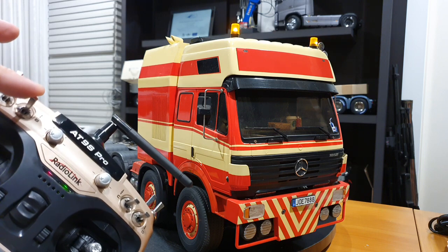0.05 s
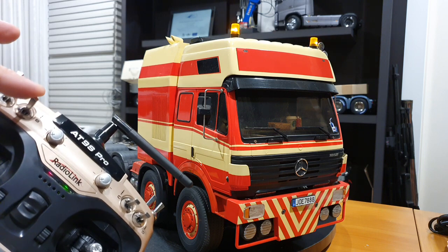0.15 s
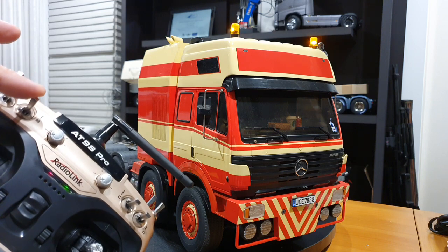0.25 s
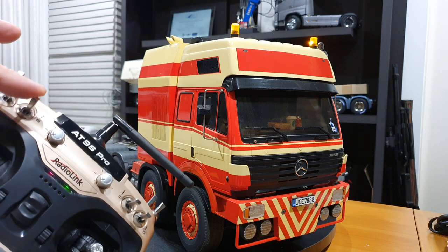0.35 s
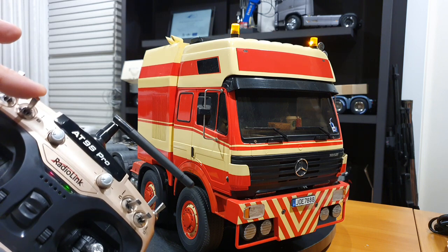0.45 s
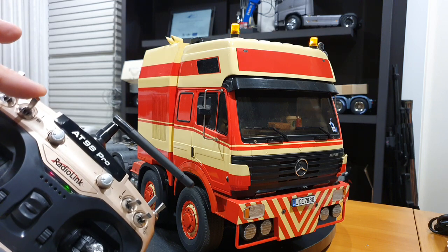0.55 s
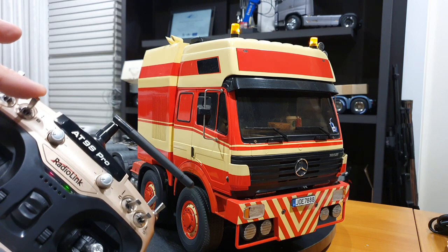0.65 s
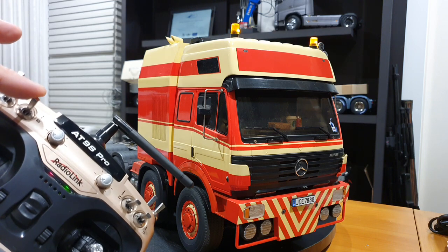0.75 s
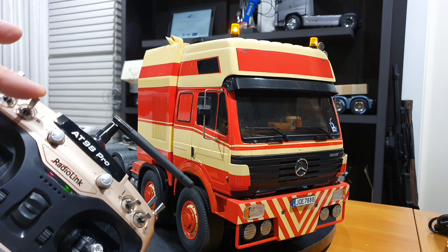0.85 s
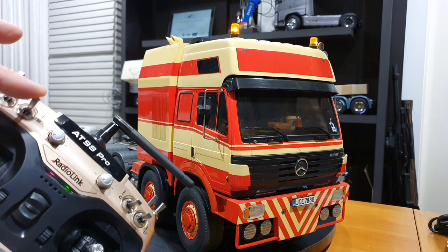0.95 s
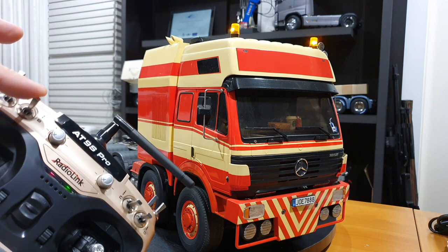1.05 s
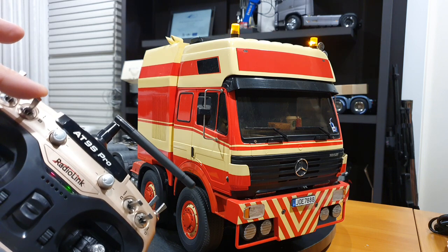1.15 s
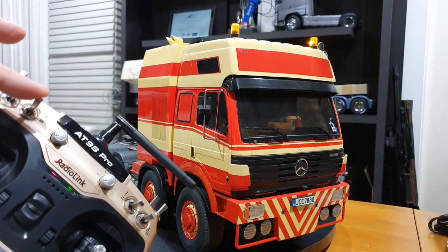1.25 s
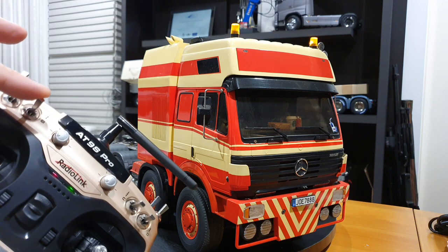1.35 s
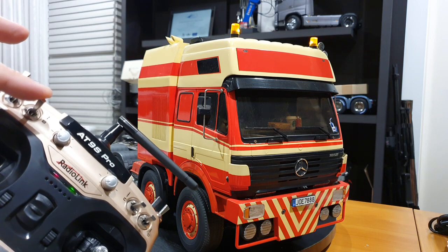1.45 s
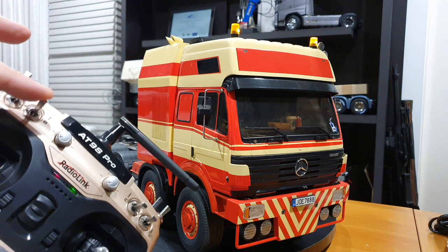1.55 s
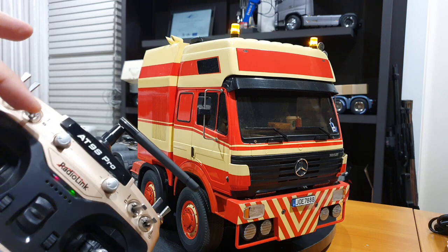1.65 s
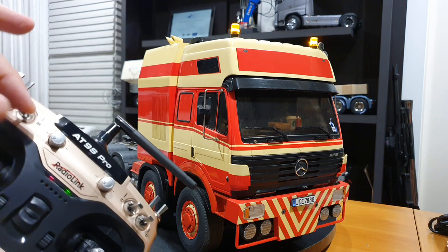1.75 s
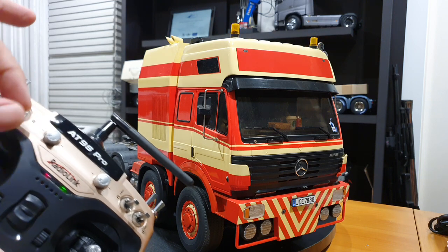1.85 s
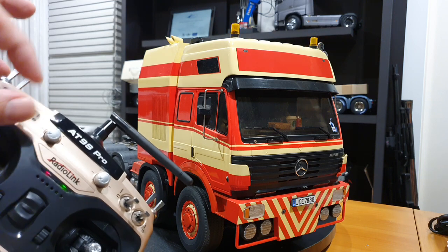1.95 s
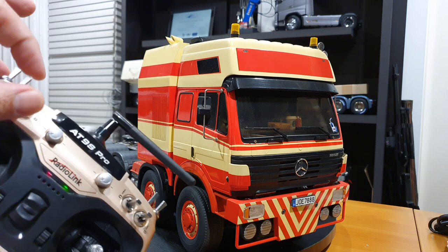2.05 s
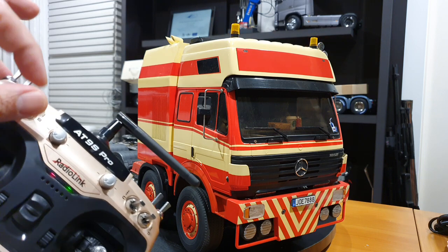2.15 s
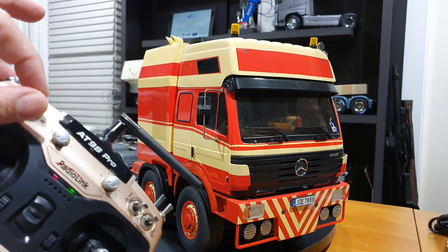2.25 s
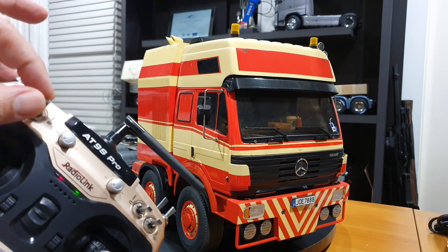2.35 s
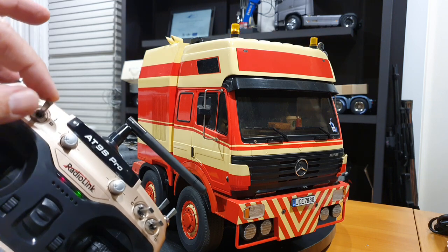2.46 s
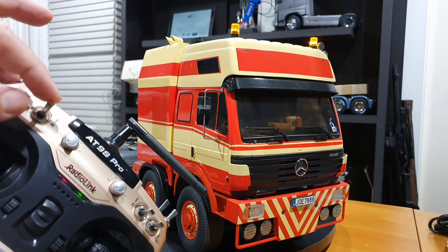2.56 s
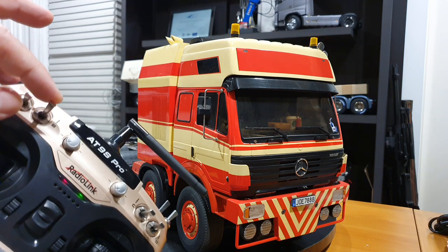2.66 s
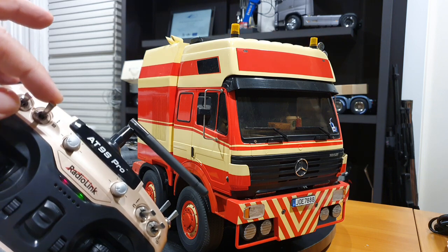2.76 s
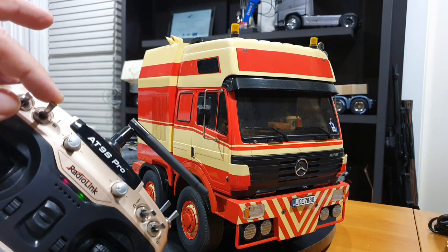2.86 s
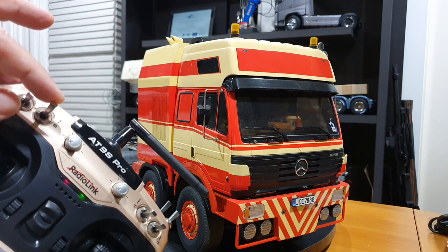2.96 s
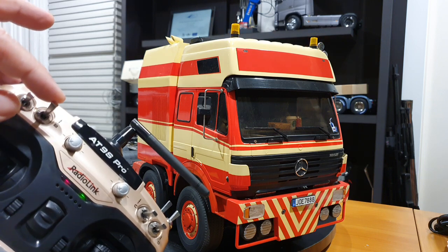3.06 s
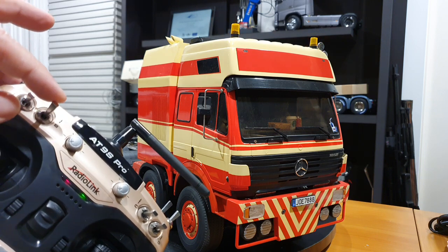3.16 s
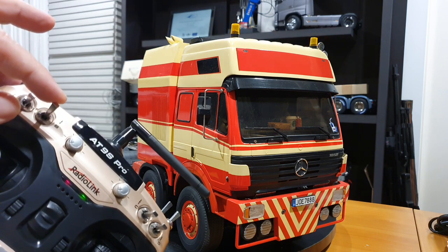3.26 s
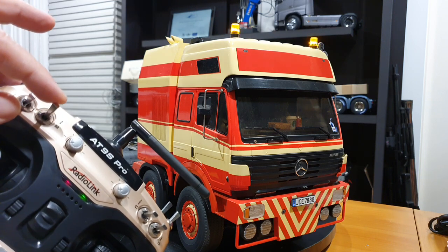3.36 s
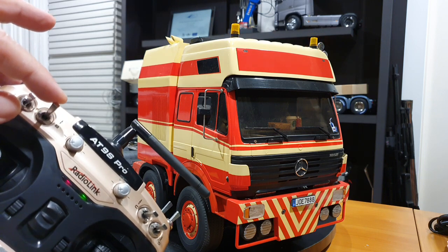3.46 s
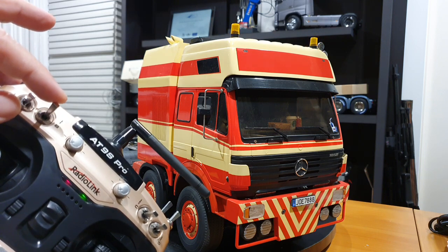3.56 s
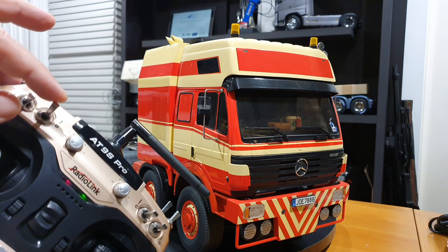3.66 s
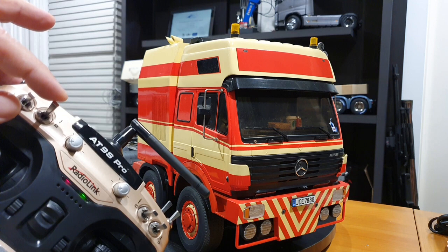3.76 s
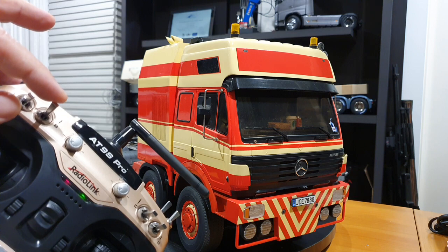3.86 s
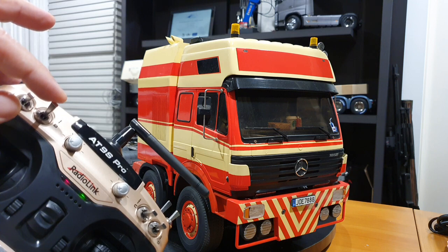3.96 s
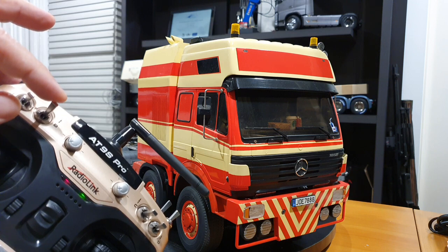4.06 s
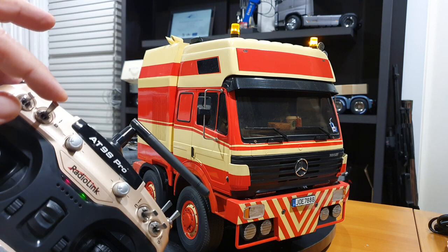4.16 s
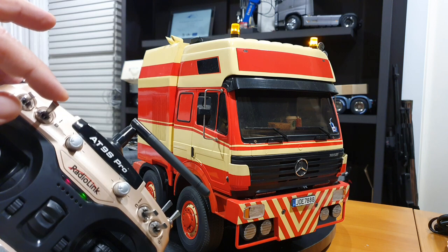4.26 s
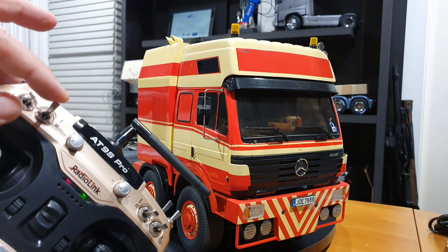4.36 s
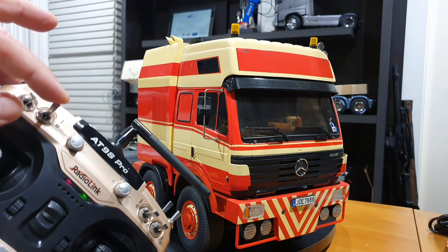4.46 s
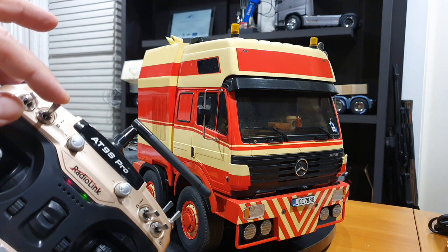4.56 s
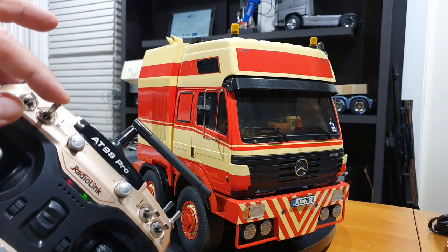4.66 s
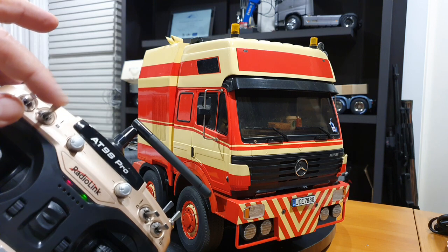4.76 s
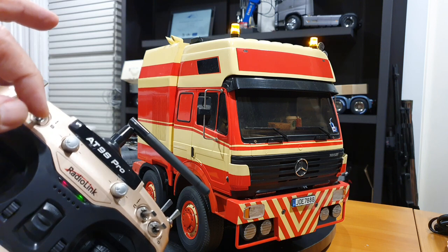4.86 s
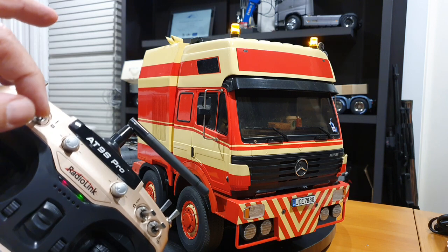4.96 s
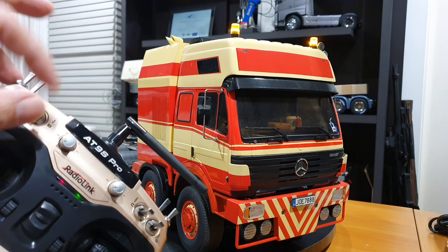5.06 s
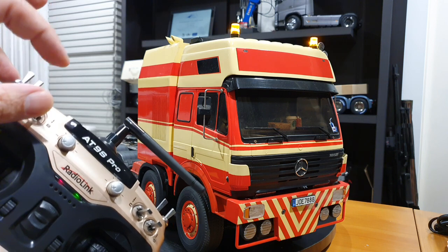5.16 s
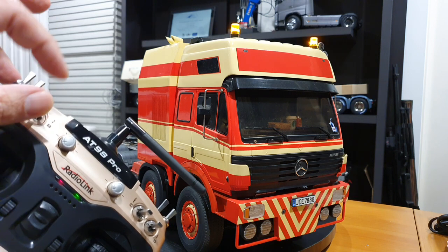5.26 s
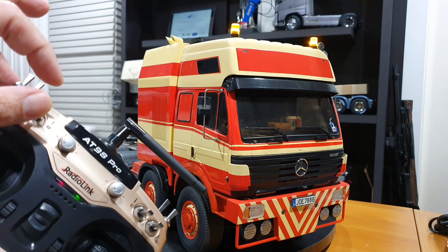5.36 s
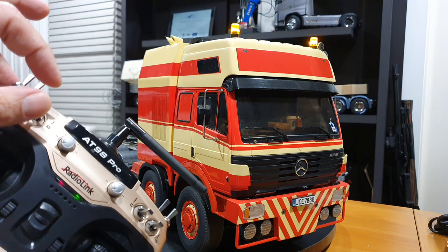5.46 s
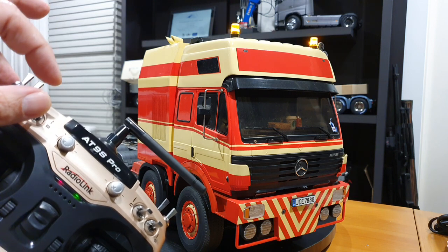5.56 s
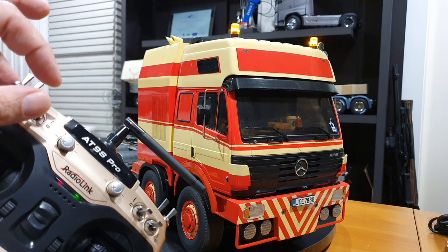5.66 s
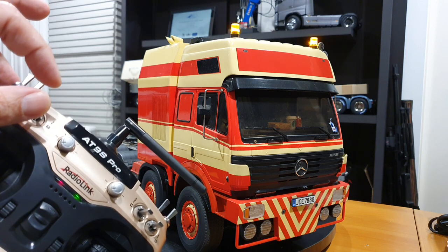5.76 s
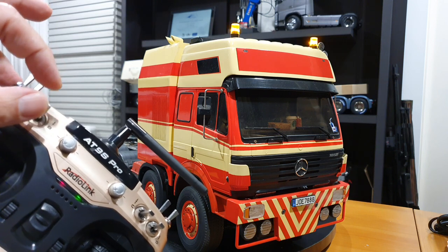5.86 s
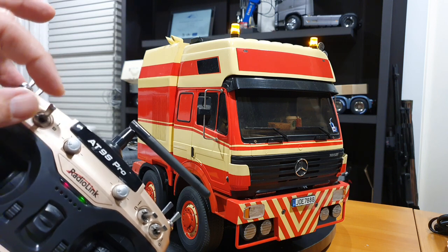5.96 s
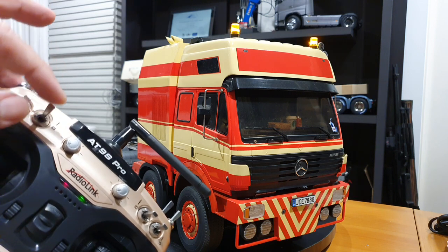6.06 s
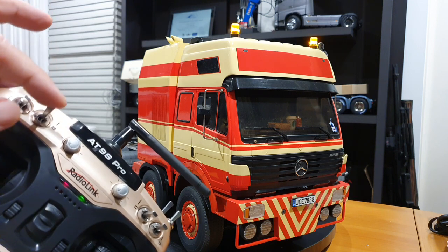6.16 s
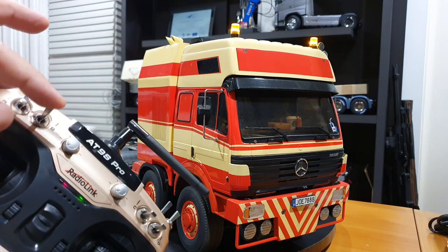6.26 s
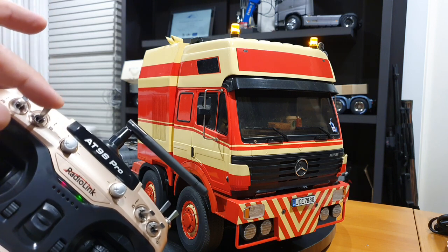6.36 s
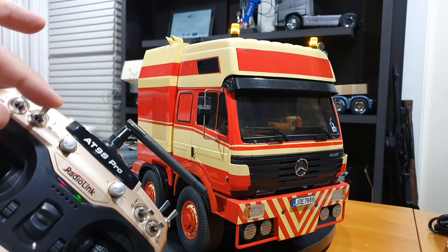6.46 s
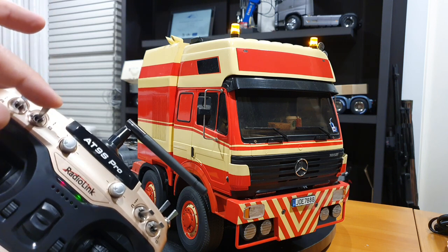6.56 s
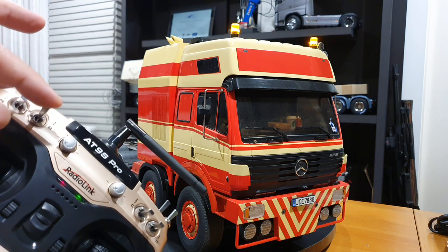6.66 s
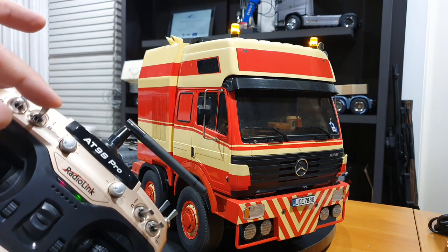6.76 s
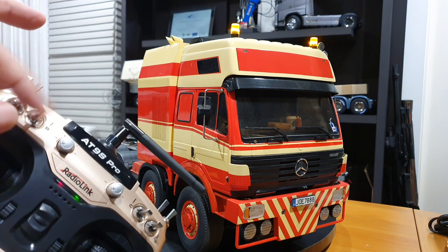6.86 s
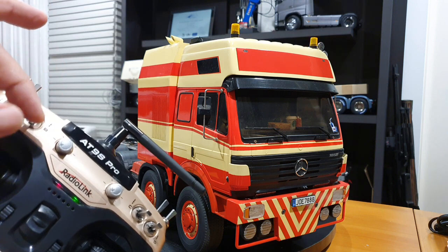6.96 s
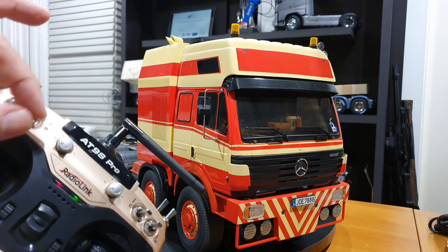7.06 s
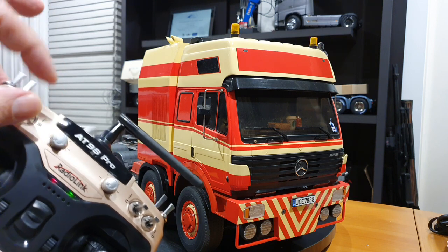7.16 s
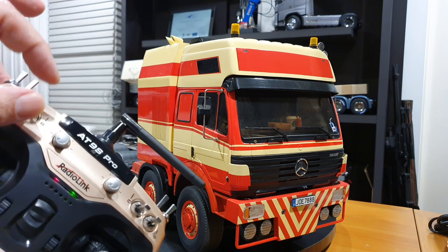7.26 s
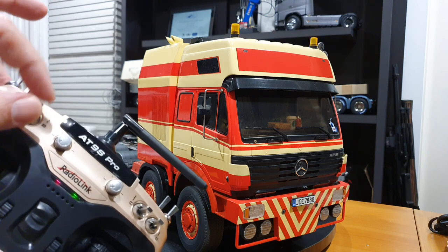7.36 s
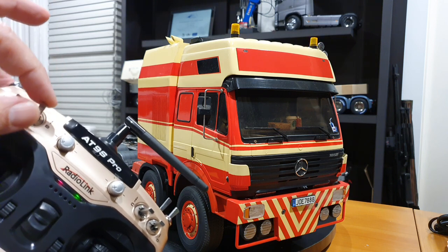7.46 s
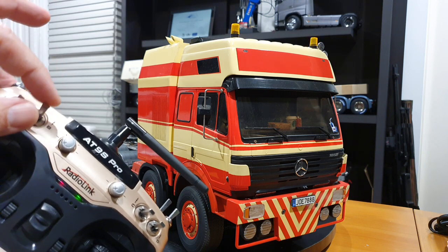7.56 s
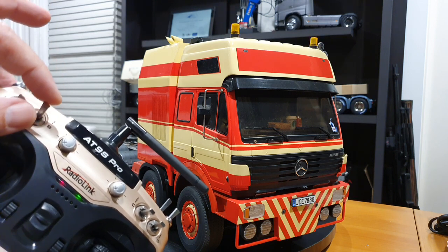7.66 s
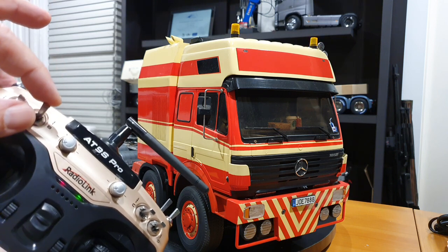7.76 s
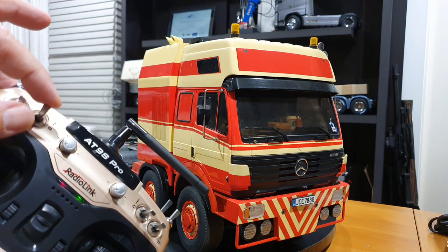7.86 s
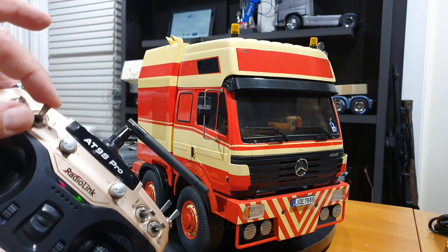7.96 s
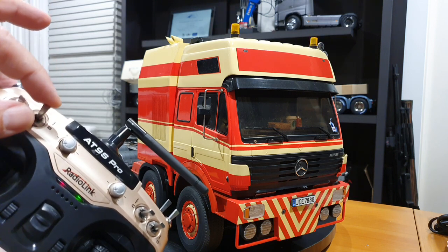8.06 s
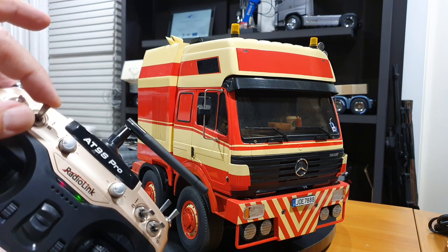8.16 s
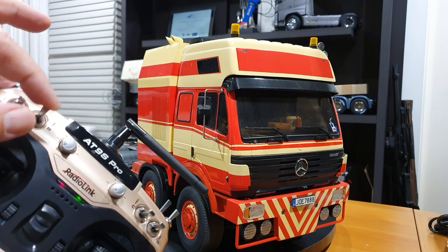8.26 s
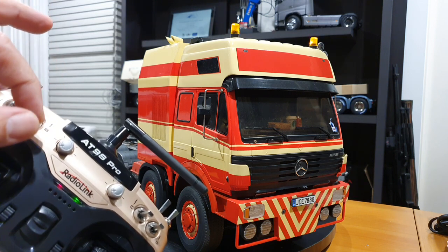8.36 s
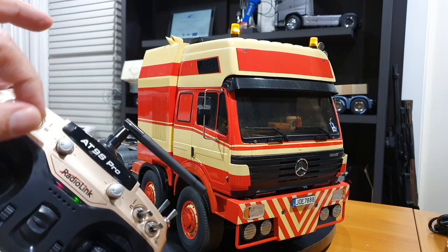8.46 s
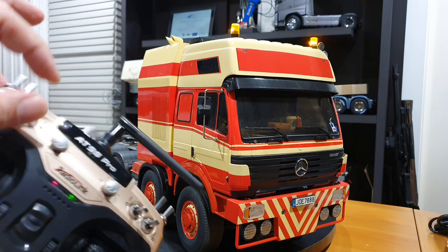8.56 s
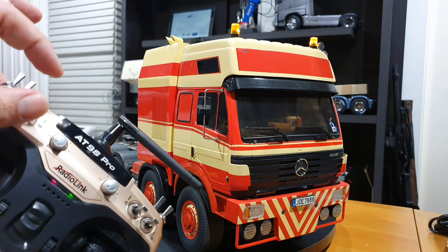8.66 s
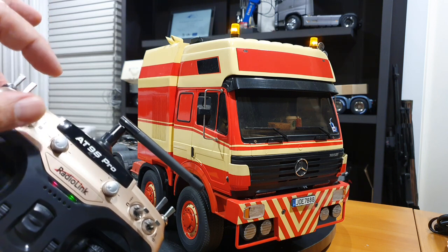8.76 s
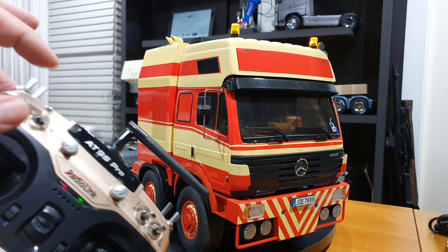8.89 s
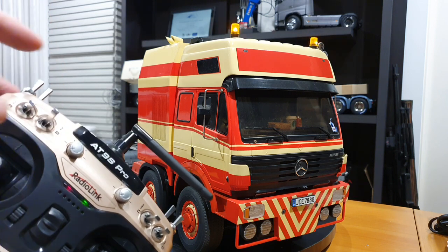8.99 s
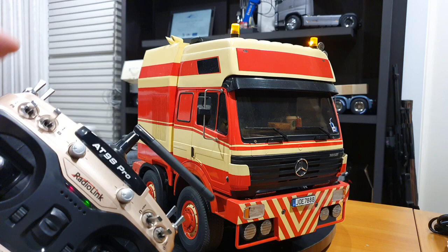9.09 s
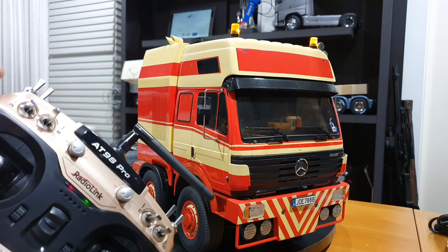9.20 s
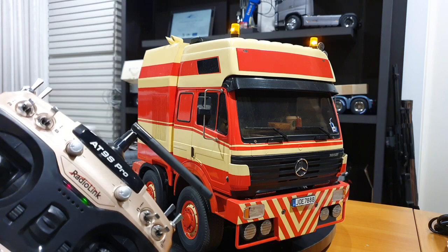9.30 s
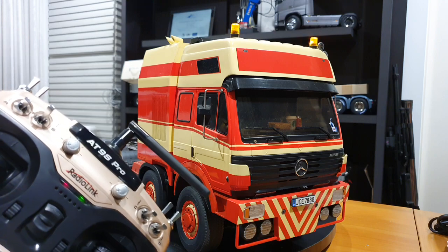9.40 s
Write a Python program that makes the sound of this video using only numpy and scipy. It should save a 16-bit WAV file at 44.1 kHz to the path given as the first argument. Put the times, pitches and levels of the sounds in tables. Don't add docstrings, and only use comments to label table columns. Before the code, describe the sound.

In a quiet furnished room, a steady soft fan rumble with low hum lines runs throughout. After nearly two seconds a springy switch lever snaps, then snaps back; after a pause of almost three seconds another pair follows, then two more pairs closer together. The clicks are dry, loud, plasticky and metallic, heard close and leaning left, with faint skin brushes on the case.

```python
import sys
import numpy as np
from scipy import signal
from scipy.fft import rfft, irfft, next_fast_len
from scipy.io import wavfile
from scipy.ndimage import uniform_filter1d

SR = 44100
rng = np.random.default_rng(int(sys.argv[2]) if len(sys.argv) > 2 else 0)


def convert_level_to_amplitude(level_db):
    exponent = np.asarray(level_db, float) / 20
    return 10 ** exponent


def persist_wave(psi):
    counts = np.round(np.clip(psi, -1, 1) * 32767).astype(np.int16)
    wavfile.write(sys.argv[1], SR, np.atleast_2d(counts).T)


N = 415863

FLIP_SAMPLES, BLOW_AT_MS = 16384, 50
THUMP_HZ = 750

# start_s, blow_db, metal_tick_db, back_panel_ring_db (set by the grip),
# bounce_pace (1 = usual)
OUT_FLIPS = [
    (1.770, 4.5, 2.5, 2.5, .9),
    (4.926, 6.5, 0, 1, 1.08),
    (7.0087, 5, 1, 1, .9),
    (8.431, 7.5, -1.5, 0, 1.15),
]
BACK_FLIPS = [
    (2.143, 5.33, 0, 0, 1.06),
    (5.2465, 4, 1.5, -4, 1.1),
    (7.290, 5.6, -1.4, 1, .95),
    (8.702, 5.3, -1.5, -1, 0.9),
]


def switch():
    out_throw = dict(release_ms=-3.5, release_db=-5, chatter_ms=-7, chatter_db=-26.5, blow_tick_db=-3)
    back_throw = dict(release_ms=-7, release_db=-10, chatter_ms=-6.5, chatter_db=-18, blow_tick_db=-4.5)
    out = np.zeros((2, N))
    for flips, throw, column in ((OUT_FLIPS, out_throw, 2), (BACK_FLIPS, back_throw, 3)):
        for start_s, *how in flips:
            sound = flip(throw, column, *how)
            add(out, sound, start_s - BLOW_AT_MS / 1000)
            add(out, room(sound), start_s)
    return out


def flip(throw, column, blow_db, tick_db, panel_db, pace):
    ms = np.arange(FLIP_SAMPLES) / SR * 1000 - BLOW_AT_MS
    rattle = convert_level_to_amplitude(-32) * np.exp(np.minimum(ms + 3, 0) / 7.5) * (ms < -3)
    push = convert_level_to_amplitude(-13.0) * rattle * rng.standard_normal(len(ms))
    lever = np.zeros(len(ms))
    lever_hz, lever_ms, tick_ms, tick_rise_ms = 2772, 1.0, 0.8, 0.045
    for at_ms, push_db, click_db, ring_db in contacts(**throw):
        since = np.maximum(ms - at_ms * pace - 0.071 * rng.standard_normal(), 0)
        push[np.argmax(since > 0)] += convert_level_to_amplitude(push_db)
        rattle = rattle + convert_level_to_amplitude(click_db) * (1 - np.exp(-since / tick_rise_ms)) * np.exp(-since / tick_ms)
        swing = np.sin(2 * np.pi * lever_hz * since / 1000)
        lever = lever + convert_level_to_amplitude(ring_db) * since * np.exp(-since / lever_ms) * swing

    case = signal.fftconvolve(case_ring(column, blow_db, panel_db), push[None], axes=1)[:, :len(ms)]
    case = convert_level_to_amplitude(-14.5) * np.array([case[0], delay(case[1], ms=0.3)])
    metal = lever + metal_tick(rattle, tick_db)
    metal = np.array([metal[0], convert_level_to_amplitude(-3.5) * delay(metal[1], ms=0.15)])
    small_body = signal.butter(4, 350, "high", fs=SR, output="sos")
    return convert_level_to_amplitude(blow_db) * signal.sosfilt(small_body, case + metal)


def contacts(release_ms, release_db, chatter_ms, chatter_db, blow_tick_db):
    blow_ms, bounce_ms, chatter_gap_ms = -1.7, 1.3, 1.8
    chatter = [(chatter_ms + k * chatter_gap_ms, -29, chatter_db, -25) for k in range(2)]
    release = (release_ms, -27, release_db, -28)
    blow = (blow_ms, 0, blow_tick_db, -26)
    bounces = [(blow_ms + (k + 1) * bounce_ms, -15.5, -3 - 0.5 * k, -28) for k in range(3)]
    return chatter + [release, blow] + bounces


# pitch_hz, t60_s, out_level_db, back_level_db, right_minus_left_db
CASE_MODES = [(504, 0.032, -3.5, 5, -12), (547, 0.024, 6.5, -6.5, -13), (656, 0.06, -9.5, -10, -6),
              (753, 0.029, -15.5, -20.5, -2.5), (923, 0.023, -21.5, -9.5, -6.5),
              (1172, 0.055, -3, -1, -4.5), (1286, 0.2, -15.5, -15, -3.5), (1310, 0.033, -11.5, -19.5, 8.5),
              (1470, 0.028, -13, -7, 2), (1670, 0.04, -5, -2, -5.5), (1868, 0.024, -6, -6.5, -3),
              (2004, 0.05, -10.5, -8.5, -1.5), (2274, 0.021, -10.5, -5, -12),
              (2375, 0.064, -7.5, -6.5, -1.5), (2434.5, 0.086, -26, -19, 1.5), (2546, 0.03, -7.5, -9, -9.5),
              (2750, 0.03, -4.5, -6.5, -8), (2900, 0.027, -13.5, -24.5, -2), (3057, 0.025, -12, -11.5, -10),
              (3530, 0.024, -11.5, -16, -15.5), (4700, 0.012, -19.5, -34, 5),
              (4670, .016, -21, -28.5, -20.5), (7380, 0.015, -11, -31, -10.5)]


def case_ring(column, blow_db, panel_db):
    modes = np.array(CASE_MODES, float)
    hz, t60, gain_db, right_db = modes[:, 0], modes[:, 1], modes[:, column], modes[:, 4]
    rock_db = 0.36 * (blow_db - 5.5)
    grip_db = panel_db * (hz < 1300)
    gain_db = gain_db + np.where(hz < THUMP_HZ, rock_db, grip_db) + 0.73 * rng.standard_normal(len(hz))

    s = np.arange(FLIP_SAMPLES)[:, None] / SR
    alternate_sign = (-1) ** np.arange(len(hz))
    rings = np.sin(2 * np.pi * hz * s) * convert_level_to_amplitude(-60 * s / t60) * alternate_sign
    rings = rings * (1 - np.exp(-hz * s / 2.1))
    far_side = np.where(hz < THUMP_HZ, -1, 1)
    return np.array([rings @ convert_level_to_amplitude(gain_db), rings @ (far_side * convert_level_to_amplitude(gain_db + right_db))])


# pitch_hz, density_db (dB per Hz)
TICK_COLOUR = [(1500, -18), (3000, 0.5), (5000, 1.5), (6500, -1.5), (7900, -10), (10500, -4.5),
               (12500, -2.5), (14000, -8), (15500, -2.5), (15900, -11), (16600, -25)]


def metal_tick(rattle, tick_db):
    alike = 0.4
    left, other = rng.standard_normal((2, len(rattle)))
    grain = np.array([left, alike * left + np.sqrt(1 - alike ** 2) * other])
    colour = convert_level_to_amplitude(curve(TICK_COLOUR, np.fft.rfftfreq(len(rattle), 1 / SR), column=1))
    return convert_level_to_amplitude(-16 + tick_db) * irfft(rfft(rattle * grain) * colour)


# pitch_hz, level_db
ROOM_BANDS = [
    (400, -18.5),
    (1000, -13.5),
    (2200, -16),
    (5000, -16.5),
    (10000, -16.5),
    (16000, -19),
]


def room(x):
    size = x.shape[1]
    noise = far_noise(size, [(20, 0), (20000, 0)])
    hz, s = np.fft.rfftfreq(size, 1 / SR), np.arange(size) / SR
    power = np.sum(np.abs(rfft(x)) ** 2, axis=0)
    body, treble = (np.abs(uniform_filter1d(power, int(blur_hz / hz[1]))) for blur_hz in (190, 1500))
    colour = np.sqrt(np.where(hz < 3800, body, treble))
    centres = np.log(np.array(ROOM_BANDS)[:, 0])
    tail = 0
    for k, (_, db) in enumerate(ROOM_BANDS):
        t60_s = 0.22 - k * 0.004
        share = np.interp(np.log(hz + 1), centres, np.arange(len(ROOM_BANDS)) == k)
        band = irfft(rfft(noise) * colour * share * (hz < 15800))
        tail = tail + band * convert_level_to_amplitude(db - 60 * s / t60_s)
    rise_ms = 0.95
    return tail * (1 - np.exp(-(s * 1000 / rise_ms) ** 2)) * convert_level_to_amplitude(-24.5)


# start_s, level_db, pitch_hz, length_ms
BRUSHES = [
    (3.950, -79, 7660, 8),
    (5.19, -82, 7500, 4),
    (5.973, -59, 1230, 4.8),
    (8.389, -74, 6600, 1.5),
]


def fingers():
    peak_ms = 23
    out, ms = np.zeros((2, N)), np.arange(2048) / SR * 1000 - peak_ms
    for start_s, db, hz, length_ms in BRUSHES:
        band = signal.butter(2, [0.83 * hz, 1.03 * hz], "band", fs=SR, output="sos")
        puff = level(signal.sosfilt(band, rng.standard_normal((2, len(ms)))), db)
        add(out, puff * np.exp(-0.5 * (ms / length_ms) ** 2), start_s - peak_ms / 1000)
    return out


# pitch_hz, density_db (dB per Hz)
FAN_COLOUR = [(22, -49.5), (33, -16), (46, -10), (60, -7.5), (75, -8), (90, -17), (124, -15), (157, -9.5),
              (215, -4.5), (252, -0.5), (280, -8.5), (419, -14.5), (673, -14), (1100, -23.5)]
# pitch_hz, density_db (dB per Hz)
HISS_COLOUR = [(530, -32), (900, -5), (1310, 0.5), (1900, -7.5), (2870, -10.5), (4000, -21), (5300, -34),
               (5950, -25.5), (6900, -34), (7500, -38.5), (9300, -48.5), (11800, -41), (14500, -40),
               (15600, -39), (15850, -79.5)]
# pitch_hz, level_db (rms), wobble_db, wobble_rate_hz, left_minus_right_db
HUM_LINES = [
    (38.5, -61.5, 2.5, 7.2, -1.5),
    (100, -61, 1.77, 13, 0.5),
    (251.8, -65, 1.5, 20, -1),
    (293.4, -64, 4.5, 6.2, 4.5),
    (364, -68, 3, 12, 6),
    (455, -72.5, 3, 10, 4.5),
    (657, -68.5, 1.7, 5, -1.5),
    (675, -66, 0.5, 2, -3.5),
    (684, -76, 2, 3.6, 1),
]


def fan():
    rumble = level(far_noise(N, list(FAN_COLOUR) + [(1500, -68.5)])[:, :N], -52.5)
    hiss = level(far_noise(N, HISS_COLOUR)[:, :N], -63.5)
    out = rumble * convert_level_to_amplitude(0.45 * walk(3)) + hiss
    s = np.arange(N) / SR - np.array([[0], [FAR_LAG_MS / 1000]])
    for hz, db, wobble_db, rate_hz, pan_db in HUM_LINES:
        phase = 2 * np.pi * hz * s + 0.067 * wobble_db * walk(rate_hz) + rng.uniform(0, 2 * np.pi)
        sides_db = np.array([[pan_db], [-pan_db]]) / 2
        out = out + level(np.sin(phase) * convert_level_to_amplitude(wobble_db * walk(rate_hz) + sides_db), db)
    return out


FAR_LAG_MS = 0.39
# pitch_hz, correlation (0-1)
LIKENESS_CURVE = [
    (30, .96),
    (215, .94),
    (300, .68),
    (450, .35),
    (750, .68),
    (1500, .42),
    (2200, .22),
    (4500, .08),
]


def far_noise(size, table):
    size = next_fast_len(size)
    hz = np.fft.rfftfreq(size, 1 / SR)
    left, other = rfft(rng.standard_normal((2, size))) * convert_level_to_amplitude(curve(table, hz, column=1))
    alike = np.clip(curve(LIKENESS_CURVE, hz, column=1), 0, 1)
    lag = np.exp(-2j * np.pi * hz * FAR_LAG_MS / 1000)
    right = alike * left * lag + np.sqrt(1 - alike ** 2) * other
    return irfft(np.array([left, right]), size)


def walk(rate_hz):
    k = int(SR / rate_hz)
    steps = np.repeat(rng.standard_normal(N // k + 1), k)
    return level(uniform_filter1d(uniform_filter1d(steps, k), k)[:N], 0)


def curve(table, hz, column):
    rows = np.array(table, float)
    return np.interp(np.log(hz + 1), np.log(rows[:, 0]), rows[:, column])


def level(x, db):
    return x * convert_level_to_amplitude(db) / np.sqrt(np.mean(x ** 2))


def delay(x, ms):
    hz = np.fft.rfftfreq(len(x), 1 / SR)
    return irfft(rfft(x) * np.exp(-2j * np.pi * hz * ms / 1000), len(x))


def add(out, sound, start_s):
    i = int(start_s * SR)
    out[:, i:i + sound.shape[1]] += sound


def scene():
    return switch() + fingers() + fan()


def band_limit(x):
    return signal.sosfilt(signal.butter(12, 17000, fs=SR, output="sos"), x)


def record(dry):
    low_cut = signal.butter(2, 30, "high", fs=SR, output="sos")
    top_cut = signal.ellip(10, 0.2, 80, 16650, fs=SR, output="sos")
    mix = signal.sosfilt(np.vstack([low_cut, top_cut]), dry)
    return band_limit(mix)


dry = scene()
out = record(dry)
persist_wave(out)
```